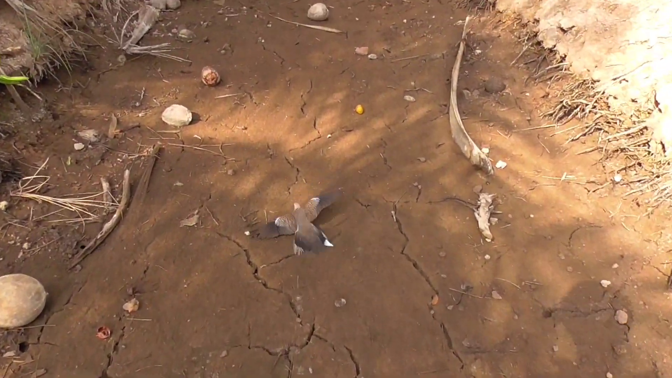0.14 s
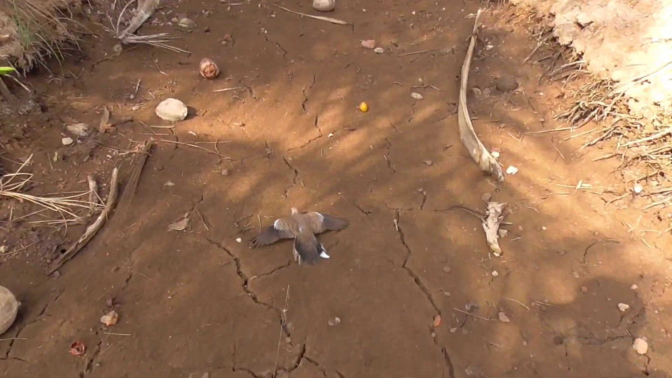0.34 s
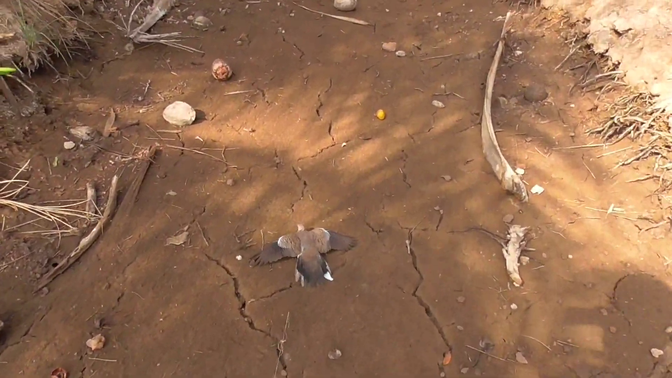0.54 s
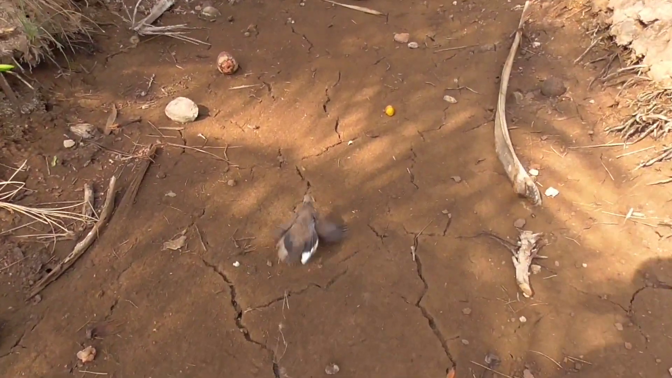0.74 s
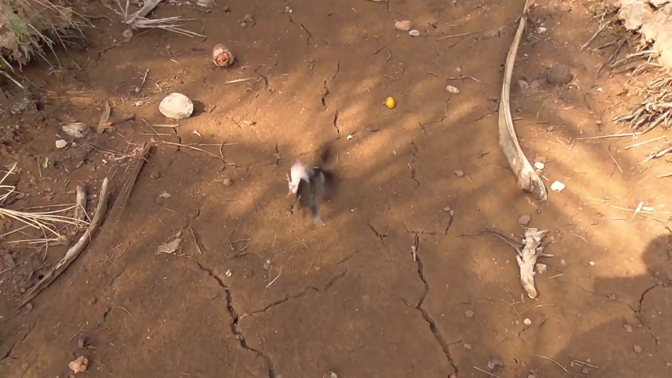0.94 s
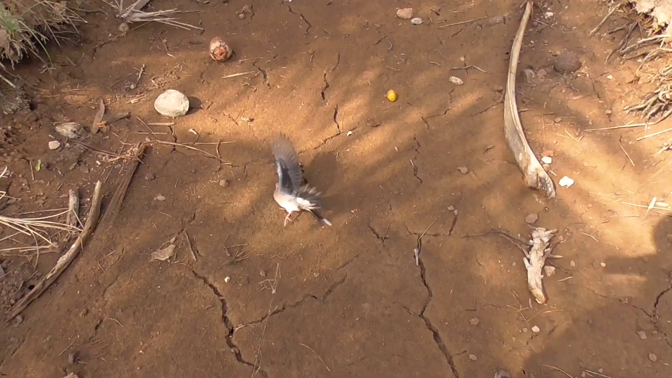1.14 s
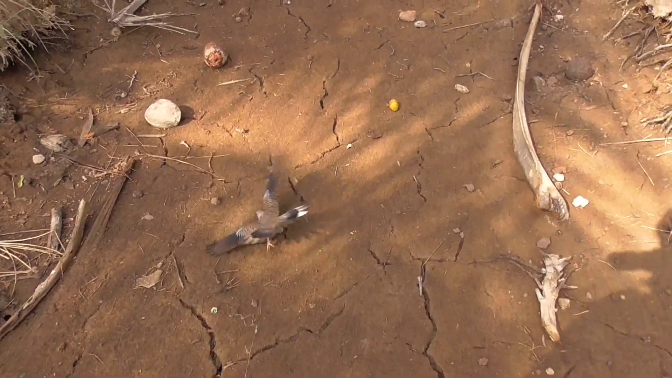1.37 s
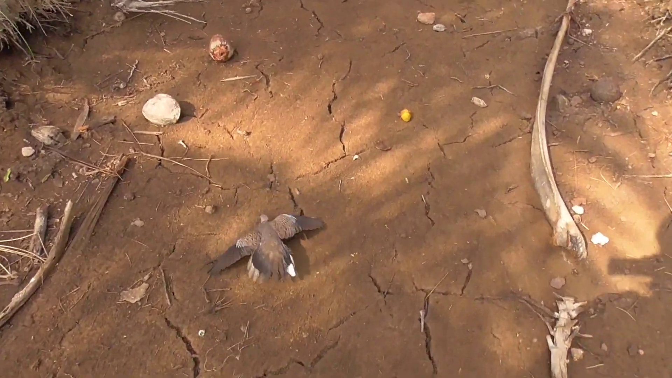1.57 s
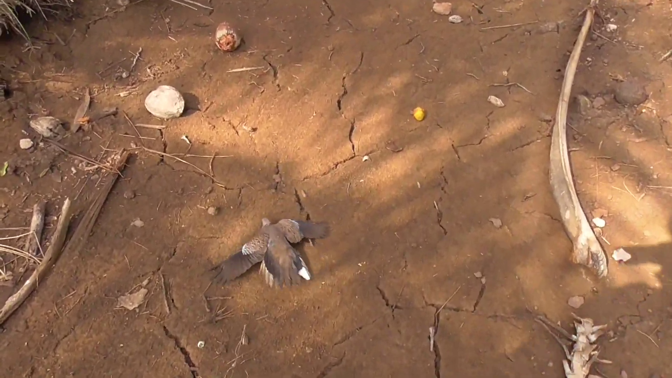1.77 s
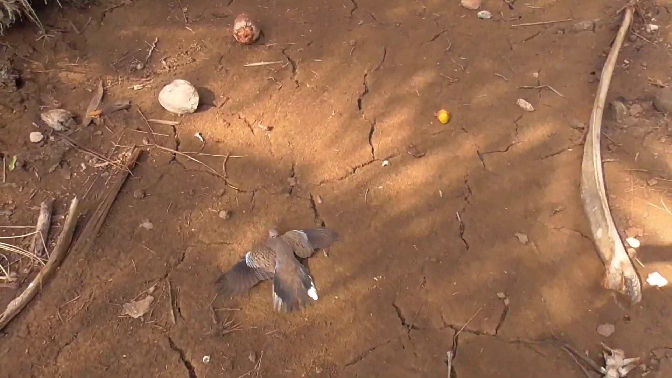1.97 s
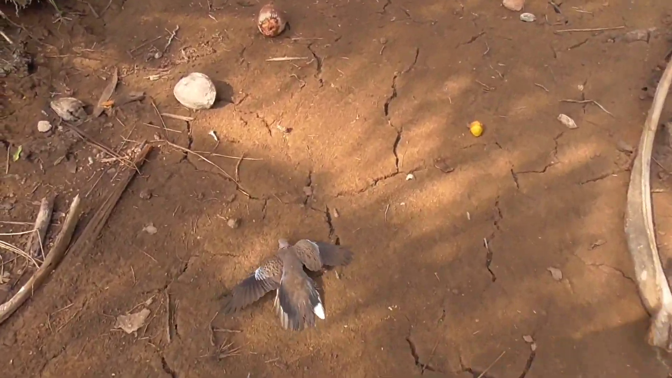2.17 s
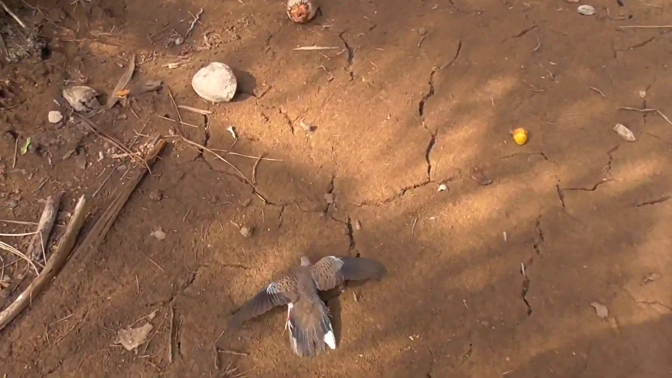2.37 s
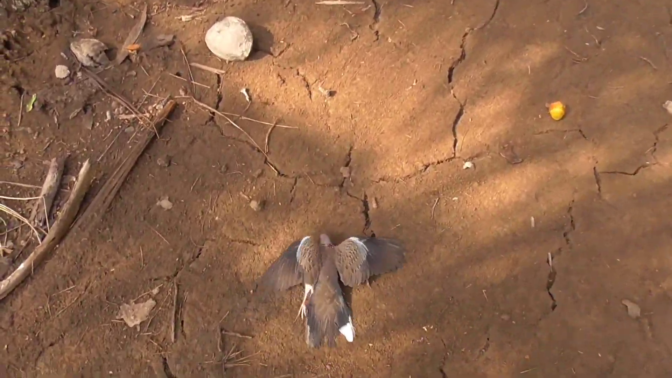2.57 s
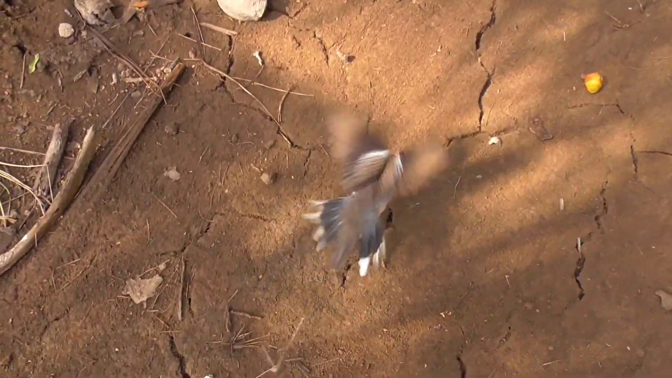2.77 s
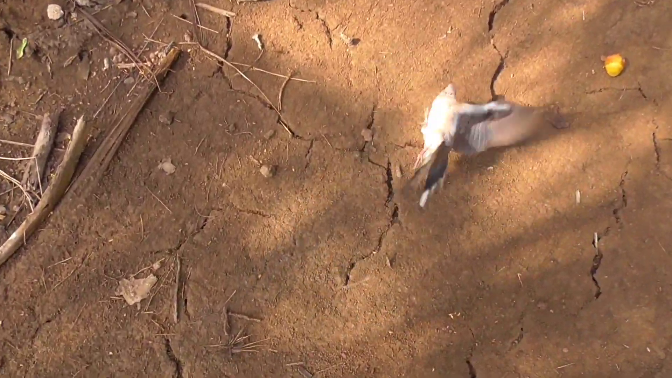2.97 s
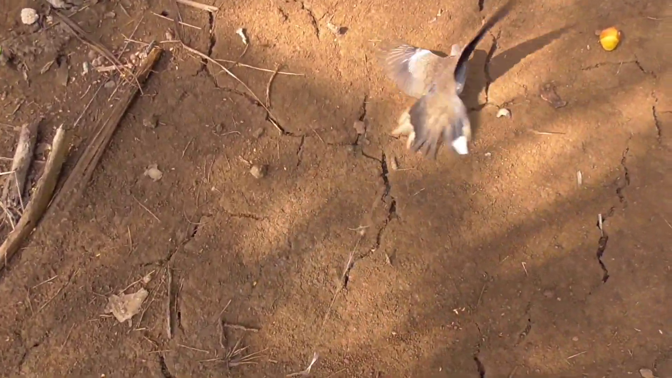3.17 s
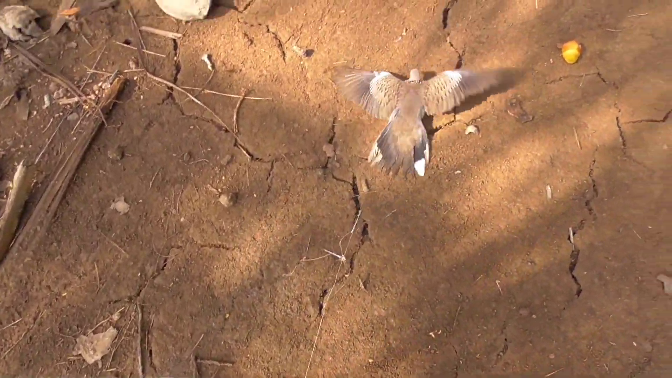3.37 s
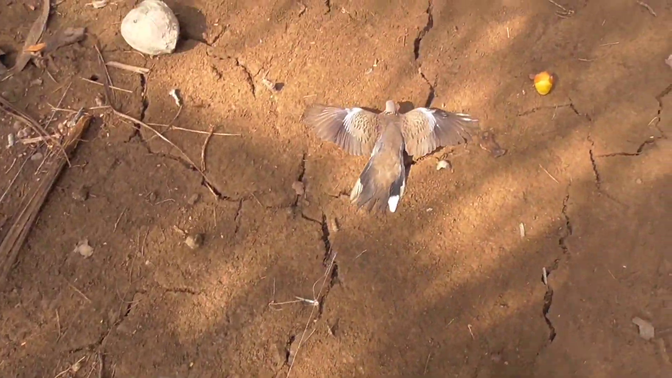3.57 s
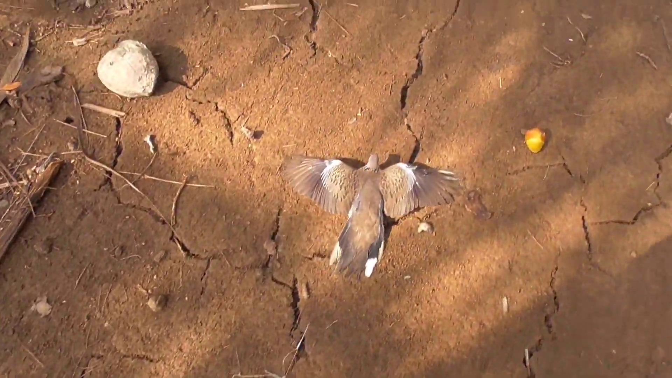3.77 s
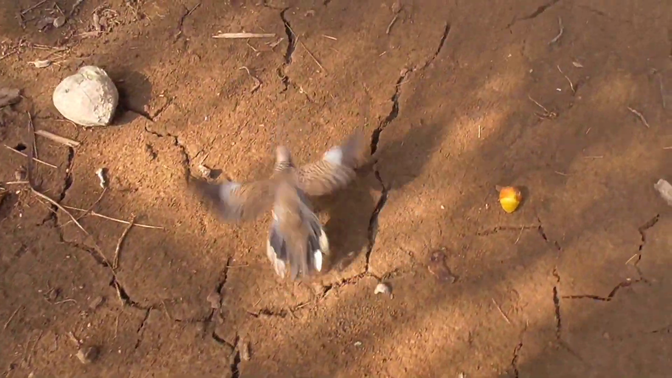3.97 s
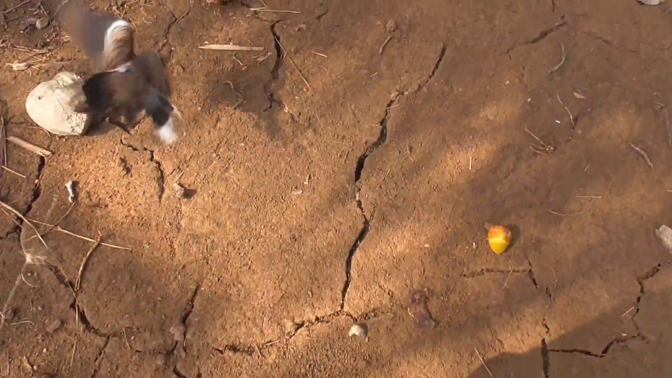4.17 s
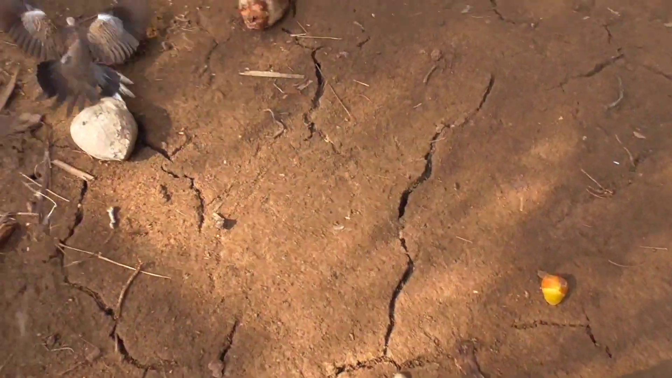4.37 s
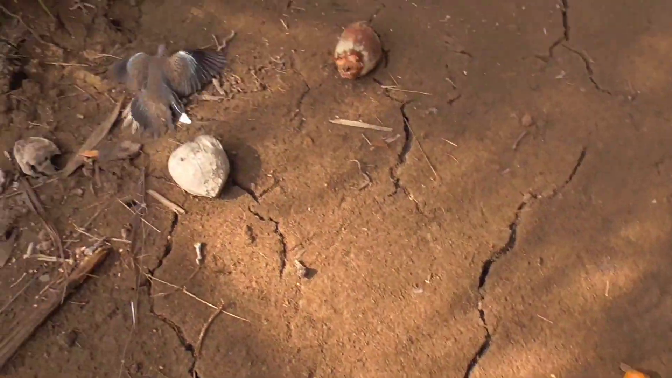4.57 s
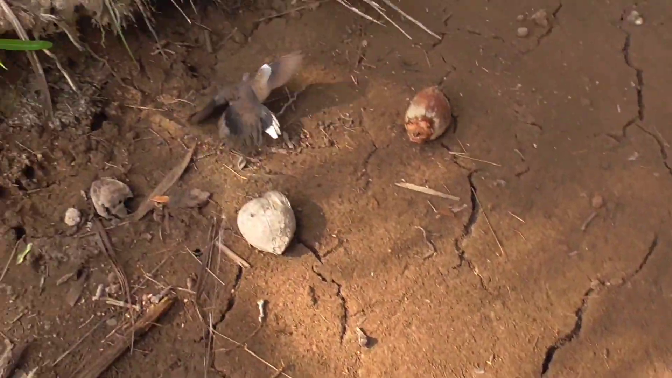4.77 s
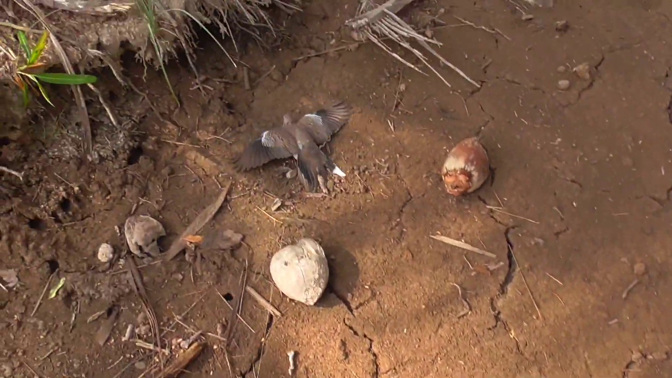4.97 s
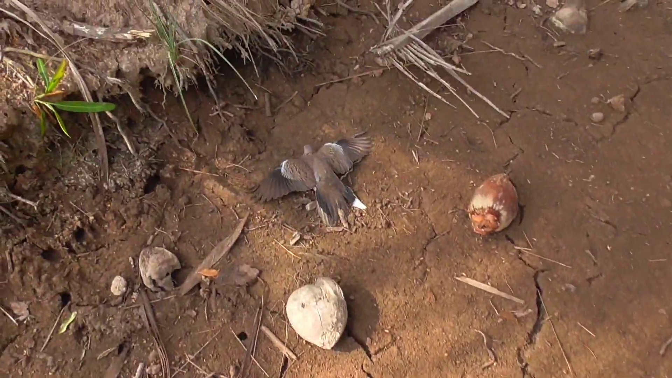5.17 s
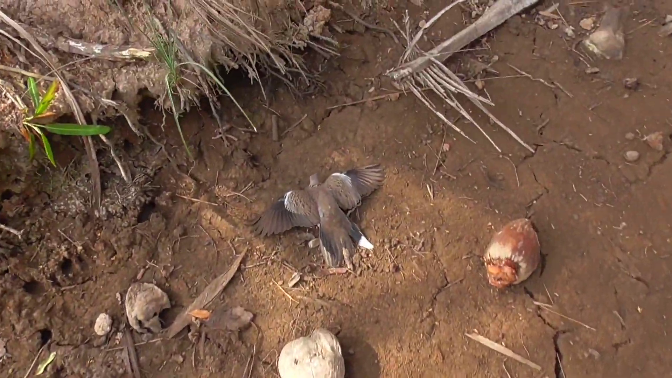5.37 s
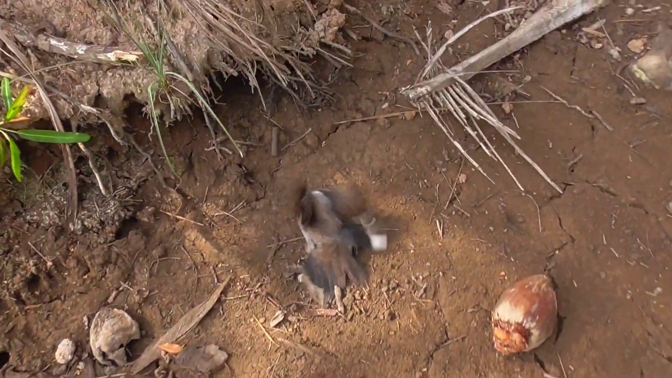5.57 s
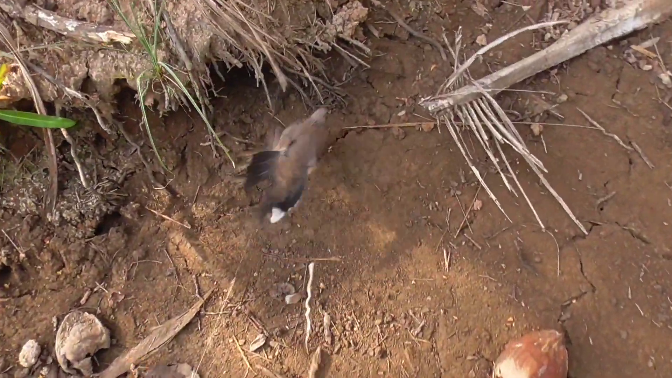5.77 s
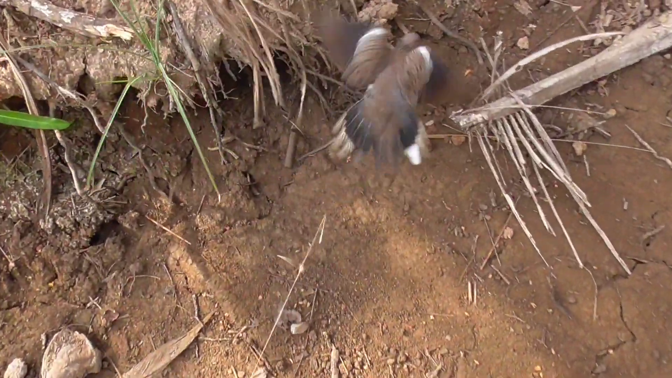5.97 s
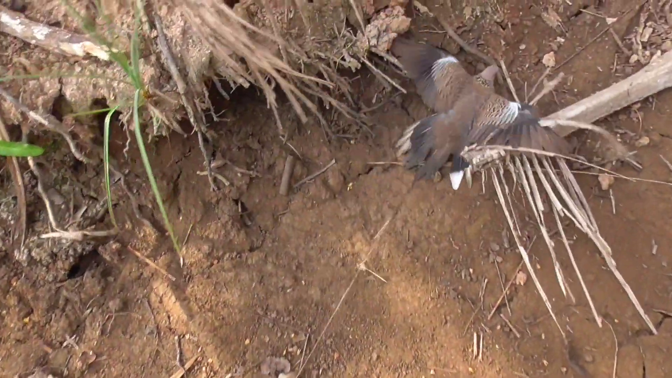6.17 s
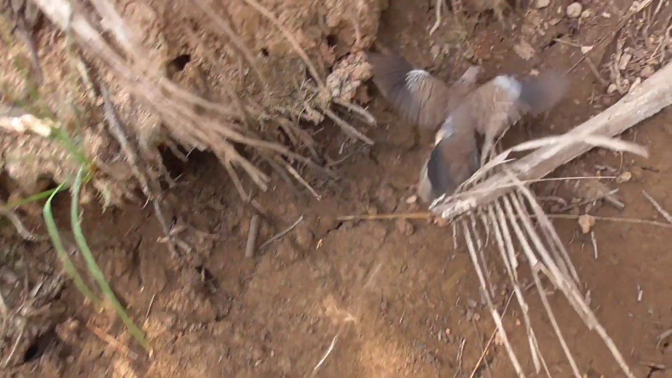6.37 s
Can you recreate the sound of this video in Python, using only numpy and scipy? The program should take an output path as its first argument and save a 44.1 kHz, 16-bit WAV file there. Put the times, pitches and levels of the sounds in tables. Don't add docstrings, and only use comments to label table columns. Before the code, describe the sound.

Open, dry outdoor ground, close stereo microphone. A quiet low rumble and thin leaf hiss run throughout. A tiny grain ping at 0.1 s starts a faint sandy trickle; around 0.5 s a soft low tail shiver. From 0.77 to 1.15 s comes the first flapping burst: low fluttering pulses, sharp quill cracks, dull knocks and bright feather scrapes on grit. A faint far motor hum swells near 1.6 s and fades by 2.5 s, with soft shuffles of air around it. A second, tight burst cracks at 2.8-3.1 s, its dust settling slowly. Near quiet follows, with small ticks. The third, hard burst at 4.0-4.3 s ends in a loud wing slap; a soft tap follows at 4.6 s. Soft shifts around 5.4-5.6 s lead to the last, longest burst, 5.7-6.2 s, dense with snaps and barb clicks, then a small scrape and flutter at 6.37 s as leaves rustle up.

```python
import sys
import numpy as np
from scipy import signal
from scipy.fft import rfft, irfft, next_fast_len
from scipy.io import wavfile
from scipy.ndimage import uniform_filter1d

SR = 44100
rng = np.random.default_rng(int(sys.argv[2]) if len(sys.argv) > 2 else 0)


def put_to_file(sound):
    columns = np.atleast_2d(sound).T
    safe = np.clip(columns, -1, 1)
    whole_steps = np.round(safe * 32767)
    wavfile.write(sys.argv[1], SR, whole_steps.astype(np.int16))


def voltage_ratio(decibels):
    exponent = np.asarray(decibels, float) / 20
    return 10 ** exponent


N = 283122
PADDED = next_fast_len(N)
BINS_HZ = np.maximum(np.fft.rfftfreq(PADDED, 1 / SR), 1)
TIME = np.arange(N) / SR
LEFT_RIGHT = np.array([[1], [-1]])
AIR_LEAN_DB, GROUND_LEAN_DB = -0.9, 0.4

# [f/Hz, level/dB]
SCRAPE_COLOUR = [(880, -35), (1500, -44), (1710, -13), (2440, -10), (3280, -3.5), (5490, -10.5),
                 (6400, -8.5), (7500, -1), (8160, 0), (9280, -0.5), (12700, -3.5), (14900, -10.5),
                 (16000, -20)]


def unit(x):
    return x / np.sqrt(np.mean(x ** 2))


def shape(table):
    hz, db = np.transpose(table)
    return voltage_ratio(np.interp(np.log(BINS_HZ), np.log(hz), db))


def colour(x, gain):
    return irfft(rfft(x, PADDED) * gain, PADDED)[..., :N]


def walk(rate):
    k = int(SR / rate)
    held = np.repeat(rng.standard_normal(N // k + 1), k)
    return 1.6 * uniform_filter1d(uniform_filter1d(held, k), k)[:N]


def stereo(mid, other, side_table):
    return mid + LEFT_RIGHT * colour(other, shape(side_table))


def lean(db, count):
    return db + 1.64 * rng.standard_normal(count)


def add(out, s, x, pan_db):
    i = int(s * SR)
    x = x[..., :N - i]
    out[:, i:i + x.shape[-1]] += x * voltage_ratio(LEFT_RIGHT * pan_db / 2)


def stir(build_s, settle_s):
    # [start t/s, length/s, effort 0-1, stretch of the settling]
    bursts = [
        (0.455, 0.033, 0.16, 1.01),
        (0.755, 0.21, 0.9, 0.97),
        (2.745, 0.23, 0.73, 1.63),
        (3.96, 0.28, 0.96, 0.74),
        (5.682, 0.25, 0.83, 1.01),
    ]
    efforts = []
    for s, length, effort, stretch in bursts:
        rise = np.clip((TIME - s) / min(build_s, length), 0, 1)
        fall = np.clip(1 - (TIME - s - length) / (settle_s * stretch), 0, 1)
        efforts.append(effort * rise * fall)
    return np.max(efforts, axis=0)


def bed():
    # [f/Hz, level/dB]
    calm_colour = [(22, -13), (50, -6.5), (85, -6.5), (185, 0), (300, -1.5), (480, -5), (800, -6.5),
                   (1350, -12.5), (1700, -21), (2600, -22), (3700, -20), (5700, -25), (8400, -19),
                   (14400, -27.5)]
    # [f/Hz, side minus mid/dB]
    width = [(60, -9), (110, -10), (200, -10), (380, -6.5), (700, -6.5), (1290, -5.5), (2380, -5),
             (4400, -2), (8120, -2.5), (15000, -0.5)]
    # [t/s, level over calm/dB]
    breeze = [(0, -1), (.35, -0.5), (.65, -2), (1.3, 0), (1.65, -1), (1.85, -1.5), (2.15, 2), (2.6, 1.5),
              (3.3, 0.5), (3.7, 3), (4.43, -1.5), (4.57, 7.5), (4.72, 0), (5.0, 6.5), (5.25, 0), (5.6, 3),
              (6.33, 12.5), (6.42, 5)]
    centres_hz = [70, 400, 3500, 9000]
    breeze_share = [0.22, 0.052, 0.69, 0.96]
    stir_db, build_s, settle_s = [17, 9.7, 10.5, 10.6], [.05, .17, .18, .19], [.2, .24, .27, .35]

    breeze_db = np.interp(TIME, *np.transpose(breeze))
    lifts = np.array([db * stir(build, settle) + share * breeze_db
                      for db, build, settle, share in zip(stir_db, build_s, settle_s, breeze_share)])
    noise = rfft(rng.standard_normal((2, PADDED))) * shape(calm_colour) * shape([(14900, 1), (15300, -45)])
    noise[1] *= shape([(25, -15)] + width)
    rustle = 0.72 * walk(26)
    out, total = 0, 0
    for hz in 25 * 2 ** np.arange(0, 9.6, .5):
        window = np.cos(np.pi * np.clip(np.log2(BINS_HZ / hz), -.5, .5)) ** 2
        mid, side = irfft(noise * window, PADDED)[:, :N]
        near = [np.interp(np.log(hz), np.log(centres_hz), row) for row in np.eye(len(lifts))]
        reach = min(hz / 70, 1)
        level_db = reach * (near @ lifts) + 0.84 * walk(14) + min(hz / 3300, 1) ** 2 * rustle
        out = out + voltage_ratio(level_db) * (mid + LEFT_RIGHT * side)
        total = total + mid
    return out / np.sqrt(np.mean(total ** 2)) * voltage_ratio(-44)


def drone():
    phase = 2 * np.pi * np.cumsum(55 * (1 + 0.022 * walk(2.97))) / SR
    nearest_s, swell_s, fades_s, fade_length_s = 1.6, 0.37, 2.4, .15
    swell_db = 4.5 * np.exp(-((TIME - nearest_s) / swell_s) ** 2)
    fade = 1 / (1 + np.exp((TIME - fades_s) / fade_length_s))
    return voltage_ratio(-56.5 + 1.5 * walk(3.8) + swell_db) * np.sin(phase) * fade


def trickle():
    centre_hz, width_hz, start_s, dies_s = 3730, 1900, .1, 0.48
    band = np.exp(-((BINS_HZ - centre_hz) / width_hz) ** 2)
    mid, side = unit(colour(rng.standard_normal((2, N)), band))
    late = TIME - start_s
    fade = (late > 0) * np.exp(-(late / dies_s) ** 2)
    return voltage_ratio(-53 + 3.0 * walk(27.8)) * (mid + LEFT_RIGHT * side) * fade


def pulses(rows):
    out = np.zeros((2, N))
    chance = rng.random((len(rows), 2))
    for row, (lag, waver), pan_db in zip(rows, chance, lean(AIR_LEAN_DB, len(rows))):
        s, db, hz, cycles, octave_db = row
        cycles = max(cycles, 1)
        u = np.arange(int(cycles / hz * SR)) * hz / SR / cycles
        phase = 2 * np.pi * cycles * u * (1.12 - 0.14 * u) - 3.0 - 1.12 * lag
        phase += .5 * np.sin(2 * np.pi * (1.53 * u + waver))
        overtone = voltage_ratio(octave_db - 2.5) * np.cos(2.17 * phase) * 1.78 * np.exp(-u / 0.66)
        swell = np.sin(np.pi * u ** 0.77) ** (0.9 + 0.069 * cycles)
        add(out, s, voltage_ratio(db) * swell * (np.cos(phase) + overtone), pan_db)
    return out


def grain():
    return pulses([(.0947, -31.5, 6210, 7.5, -29)])


def shuffles():
    # [t/s, level/dB, f/Hz]
    shifts = [(0.386, -47, 339), (1.439, -36, 256), (2.279, -44, 310), (2.41, -31.5, 273),
              (2.634, -35, 264), (4.831, -34, 258), (5.336, -30, 374), (5.385, -40, 307), (5.416, -30, 331),
              (5.577, -29, 297), (5.62, -37, 276)]
    return pulses([(s, db - 4.5, hz, 4, -9) for s, db, hz in shifts])


def shiver():
    # [t/s, level/dB, f/Hz, cycles]
    beats = [
        (0.473, -29, 135, 2.1),
        (.479, -33, 190, 1.6),
        (0.514, -31, 125, 1.9),
        (.524, -36, 120, 1.8),
    ]
    return pulses([tuple(row) + (-11,) for row in beats])


def puffs():
    # [t/s, level/dB, f/Hz]
    sheds = [(0.867, -30, 243), (0.983, -24, 265), (0.998, -22, 286), (2.878, -19, 254), (2.9284, -20, 232),
             (2.964, -22, 207), (2.98, -19, 289), (4.0185, -21.5, 224), (4.0311, -17, 208),
             (4.048, -19, 237), (4.1026, -21, 242), (4.128, -21, 219), (4.209, -21, 235), (4.253, -26, 223),
             (5.873, -17, 200), (5.883, -28, 245), (5.917, -27, 182), (5.9293, -33, 237),
             (5.997, -17.5, 203), (6.015, -22, 236), (6.0322, -21, 183), (6.043, -28, 242)]
    return pulses([(s, db, hz, 1.56, -18) for s, db, hz in sheds])


def eddies():
    # [t/s, level/dB, f/Hz, cycles]
    rolls = [(.492, -33, 280, 4.8), (.846, -30, 220, 1.6), (.868, -25, 300, 2), (.951, -23, 292, 3),
             (1.112, -30, 292, 3.3), (1.136, -28, 910, 3.7), (2.885, -20, 308, 2.2), (2.921, -23, 200, 1.5),
             (4.044, -16, 850, 2.2), (4.054, -24, 600, 2.2), (4.095, -23, 200, 2), (4.18, -24, 210, 1.3),
             (5.735, -24, 704, 3.6), (5.808, -23, 300, 2.2), (5.829, -18, 450, 2.2),
             (5.835, -14.5, 1020, 2.8), (5.842, -19, 800, 2.6), (5.866, -20, 800, 2.8),
             (5.884, -24, 280, 2), (6.373, -29.5, 796, 2.8)]
    return pulses([tuple(row) + (-13,) for row in rolls])


def ticks():
    # [t/s, level/dB, f/Hz]
    flicks = [(0.4014, -39, 8660), (1.6316, -27, 9120), (3.5254, -35, 9030), (4.198, -16, 9770),
              (4.2687, -28, 8940), (4.3415, -30, 4200), (4.3784, -40, 8840), (4.42, -27, 8300),
              (5.9334, -23, 10500), (5.9663, -21, 8740), (5.9877, -18, 7850), (6.0074, -13, 10700),
              (6.0364, -23, 8360), (6.0884, -14, 7720), (6.112, -18, 9150), (6.1354, -20, 8070)]
    return pulses([(s, db - 5.5, hz, 7.3, -40) for s, db, hz in flicks])


def barbs():
    # [t/s, level/dB, f/Hz]
    clicks = [(0.0961, -33, 5800), (0.3984, -34, 9300), (0.7717, -30, 9100), (0.8046, -29, 8600),
              (0.8158, -20, 4000), (0.8304, -8, 5200), (0.8316, -17, 8100), (0.8341, -15, 9600),
              (0.9457, -23, 7800), (0.9752, -13, 4200), (1.0646, -26, 9700), (1.0748, -33, 8200),
              (1.1272, -28, 7700), (1.1482, -27, 7300), (1.6486, -34, 9800), (1.8872, -34, 9500),
              (2.1291, -34, 7800), (2.7955, -13, 9500), (2.8806, -10, 9300), (2.9271, -22, 7300),
              (2.941, -30, 8100), (2.9517, -22, 6200), (3.0172, -30, 9300), (3.0215, -28, 8200),
              (3.0354, -23, 8500), (3.0667, -29, 9600), (3.0711, -28, 6100), (3.0766, -28, 7100),
              (3.1092, -25, 7900), (3.1836, -28, 5300), (3.3725, -34, 9600), (3.3739, -36, 7200),
              (3.6996, -35, 9400), (4.0463, -9, 8400), (4.0519, -7, 7900), (4.0664, -20, 8000),
              (4.122, -14, 5100), (4.1989, -18, 9000), (4.2698, -24, 6500), (5.033, -35, 8300),
              (5.6779, -25, 8600), (5.7548, -12, 6900), (5.7858, -25, 7800), (5.8301, -12, 7800),
              (5.8325, -6, 8400), (5.9068, -6, 7500), (5.9502, -25, 5500), (5.9675, -20, 8900),
              (5.9833, -23, 7600), (5.996, -9, 7300), (6.017, -9, 9900), (6.0633, -26, 8000),
              (6.0922, -17, 7300), (6.1366, -21, 10700), (6.178, -29, 7900), (6.1858, 0, 5300),
              (6.2831, -30, 6700), (6.3856, -22, 9100)]
    click_ms, fizz_ms, fizz_db = 0.14, 1.1, -14
    out = np.zeros((2, N))
    ms = np.arange(-32, 224) / SR * 1000
    chance = rng.standard_normal((len(clicks), 2, len(ms) + 2))
    for (s, db, hz), c in zip(clicks, chance):
        ears = c[0] + .3 * LEFT_RIGHT * c[1]
        click = np.exp(-(ms / click_ms) ** 2) * np.cos(2 * np.pi * hz * ms / 1000 + 2 * ears[:, :1])
        fizz = np.diff(ears[:, 1:]) * (ms > 0) * np.exp(-abs(ms) / fizz_ms)
        add(out, s - 32 / SR, voltage_ratio(db - 3.5) * (click + voltage_ratio(fizz_db) * fizz), GROUND_LEAN_DB + c[1, 1])
    return out


def taps():
    # [t/s, level/dB, f/Hz, rise/ms, fall/ms]
    contacts = [(.5022, -23, 136, 15, 10), (4.3467, -18, 290, 2.2, 2.6), (4.5904, -29, 900, .6, .9),
                (4.5951, -11.5, 850, .9, 1.1), (4.6022, -23, 950, .6, .9), (4.379, -31, 1100, .5, .8),
                (4.3435, -26, 600, .7, .7), (6.1868, -17, 1450, .45, 1.6), (3.0595, -30, 1500, .45, .8),
                (3.1225, -27, 1900, .4, .7), (6.043, -25, 1800, .4, .8)]
    out = np.zeros((2, N))
    ms = np.arange(-SR // 25, SR // 25) / SR * 1000
    for s, db, hz, rise, fall in contacts:
        phase = 2 * np.pi * hz * ms / 1000
        octave = (hz < 200) * voltage_ratio(-4) * np.cos(2 * phase - .4)
        swell = np.exp(-(ms / np.where(ms < 0, rise, fall)) ** 2)
        add(out, s + ms[0] / 1000, voltage_ratio(db) * swell * (np.cos(phase) + octave), 0.2)
    return out


def knocks():
    # [t/s, level/dB, f/Hz]
    hits = [(0.517, -36, 864), (.525, -36, 886), (.553, -34, 855), (.566, -36, 490), (.799, -24, 536),
            (.823, -15, 960), (.877, -31, 759), (0.909, -18, 900), (.934, -22, 900), (.947, -19, 716),
            (.988, -22, 650), (1.042, -26, 676), (2.911, -16.5, 550), (2.924, -23, 958), (2.9507, -19, 680),
            (2.956, -12.5, 1140), (2.964, -16, 659), (2.987, -20, 800), (3.04, -22, 1170),
            (4.166, -19, 453), (4.179, -23, 875), (4.232, -19, 530), (4.309, -29, 678), (5.792, -16.5, 517),
            (5.989, -19, 1020), (6.041, -19, 649), (4.5743, -31, 1200)]
    return pulses([(s, db - 2, hz, 2.3, -9) for s, db, hz in hits])


def snaps():
    # [t/s, crack level/dB, ring level/dB, ring f/Hz, ring t60/s]
    strikes = [(0.8293, -4.5, -18, 1100, 0.013), (.9062, -10, -11.5, 810, 0.0065),
               (0.976, -8, -13, 1050, 0.0087), (1.11, -5, -10.5, 850, 0.0064),
               (2.7861, -2.5, -6.5, 850, 0.0056), (2.8756, -7.5, -10.5, 1330, 0.0056),
               (2.8826, -4, -25, 960, 0.0037), (2.9514, -34, -24, 820, .037), (2.9592, -5, -22, 890, 0.028),
               (3.2019, -24, -35, 1000, 0.059), (4.0498, -1, -15.5, 1270, 0.015),
               (4.1218, -15, -10.5, 990, 0.0058), (4.1327, -9, -27, 930, 0.017),
               (4.4186, -29, -41, 860, .045), (3.1015, -24, -29, 900, 0.01),
               (5.753, -0.5, -16, 1100, 0.017), (5.8305, -25, -23, 1020, 0.026),
               (5.9063, -5.5, -16.5, 1340, 0.016), (5.9676, -23, -29, 635, 0.057),
               (5.9965, -6, -12, 1030, 0.008), (6.0205, -8, -23, 740, 0.039), (6.0717, -12, -8, 810, 0.017),
               (6.1857, -1.5, -5, 837, 0.017), (6.291, -24, -25.5, 730, 0.034)]
    crack, ring = np.zeros((2, 2, N))
    t = np.arange(SR // 16) / SR
    chance = rng.standard_normal((len(strikes), 2, 256)) * np.exp(-t[:256] / 0.00066)
    for row, (a, b), pan_db in zip(strikes, chance, lean(GROUND_LEAN_DB, len(strikes))):
        s, db, ring_db, hz, t60 = row
        ears = np.array([a + 0.1 * b, a - 0.42 * b])
        add(crack, s, voltage_ratio(db + 6.5) / abs(a).max() * ears, pan_db)
        decay = np.exp(-np.log(1000) * t / t60) * (1 - np.exp(-t / 0.00035)) ** 2
        phase = 2 * np.pi * hz * (0.817 * t + 0.0005 * (1 - np.exp(-t / 0.0025)))
        upper = voltage_ratio(-10) * np.exp(-3.5 * t / t60) * np.sin(1.31 * phase)
        add(ring, s - .0008, -voltage_ratio(ring_db) * decay / decay.max() * (np.sin(phase) + upper), pan_db)
    return colour(crack, shape(SCRAPE_COLOUR) * shape([(9000, 1.0), (14000, -5.5)])) + ring


def grit(spread_db, share):
    big = (rng.random(N) < share) * voltage_ratio(spread_db * np.minimum(rng.exponential(size=N), 3))
    return rng.standard_normal(N) * (1 + big)


def even(x):
    power = uniform_filter1d(x ** 2, int(7.8 * SR / 1000)) + .02
    return unit(x / np.sqrt(power))


def scrapes():
    # [t/s, level/dB, rise/ms, fall/ms, body below 2 kHz/dB]
    strokes = [(.8145, -23.5, 5, 15, -4.5), (.899, -22, 3.5, 10.5, 2), (1.6081, -44, 15, 22, -3),
               (2.28, -61, 9.5, 33, 20), (2.7847, -12.5, 1.7, 2.1, -4.5), (2.798, -24.5, 12.3, 4.9, -4.5),
               (2.864, -16.5, 20.3, 5.1, -2.5), (3.264, -42.5, 16, 34, -20), (4.041, -14.5, 8.4, 3.5, -0.5),
               (4.0969, -35, 27, 22, -1), (4.117, -19, 17, 4.8, 1), (4.2084, -24, 5.4, 2.3, -5),
               (5.6779, -41, 48, 180, 0.5), (5.748, -17, 6, 9, -8), (5.816, -20.5, 19, 7.7, -2),
               (6.066, -13.5, 7, 4.5, -5), (6.364, -30, 12.4, 7.2, -9.5), (.471, -61, 21, 30, 20.5)]
    # [t/s, level/dB, body below 2 kHz/dB]
    drags = [(.381, -47, -22), (0.938, -33, -10), (0.972, -31.5, 2.5), (1.046, -37, -1), (1.128, -41.5, -2),
             (1.203, -44, -10), (2.767, -38.5, 8), (2.842, -35.5, 8), (2.918, -40, 4), (2.947, -27, 5),
             (3.029, -34.5, 5), (3.0978, -38, 7), (3.118, -35, 1), (3.175, -36, 2.5), (3.351, -47, -22),
             (3.377, -49, 6), (3.521, -43, -9), (4.021, -33.5, 2.5), (4.195, -35.5, 7.5), (4.258, -43, 8.5),
             (4.28, -44, -5), (.508, -57, 13.5), (.548, -65, 11), (4.337, -44.5, 8), (5.7654, -38, -7),
             (5.889, -27.5, 3), (5.915, -44, -2), (5.984, -29, 3), (6.0344, -45, 10), (3.06, -40, -9),
             (6.097, -36, -15), (6.227, -30, -2)]
    # [t/s, level/dB, body below 2 kHz/dB]
    catches = [(.769, -39, -20), (.796, -34, 6.5), (0.816, -29, 4), (1.087, -49, 8), (1.1087, -28, 2),
               (1.206, -49, 15.5), (2.7923, -19.5, -6), (3.384, -50, 13), (4.059, -24, -15),
               (4.3092, -53, 19.5), (4.378, -54, 15), (4.418, -38.5, -20), (4.589, -47, 15), (4.6, -52, 12),
               (6.0168, -16.5, -12), (6.159, -27, -19), (6.185, -23, 5), (6.197, -27, -7), (6.229, -40, -1),
               (6.386, -30.5, -12), (6.089, -30, -18), (6.11, -33, -6), (5.917, -28, -8), (2.955, -24, -6),
               (4.197, -34, -10), (5.9325, -41, -7), (6.006, -29, -13), (6.036, -37, -5), (.398, -46, -20),
               (3.524, -51, -8)]
    # [f/Hz, level/dB]
    body_colour = [(80, -49), (200, -7), (500, 0.5), (900, 2), (1400, -3), (2200, -11.5), (3500, -30.5)]
    # [f/Hz, side minus mid/dB]
    width = [(60, -10), (110, -10), (200, -17), (380, -11), (700, -17), (1290, -15), (2380, -14.5),
             (4400, -9), (8120, -8), (15000, -4.5)]

    rows = (list(strokes)
            + [(s, db, 5.1, 17.4, body_db) for s, db, body_db in drags]
            + [(s, db, 1.1, 4.8, body_db) for s, db, body_db in catches])
    bright, coarse, body = np.zeros((3, 2, N))
    ms = np.arange(SR // 6) / SR * 1000
    for (s, db, rise, fall, body_db), pan_db in zip(rows, lean(GROUND_LEAN_DB, len(rows))):
        late = np.maximum(ms - rise, 0)
        onset = np.minimum(ms / rise, 1)
        swell = onset ** 1.1 * (np.exp(-late / fall) + 0.091 * np.exp(-late / 40))
        coarse_swell = onset * (np.exp(-late / fall / .85) + .075 * np.exp(-late / 35))
        add(bright, s, swell * voltage_ratio(db - 1.08), pan_db)
        add(coarse, s, coarse_swell * voltage_ratio(db - 0.7), pan_db)
        add(body, s, swell * voltage_ratio(db + body_db - 3.0), pan_db)

    rough = voltage_ratio(2.03 * walk(400))
    hiss = [unit(colour(grit(0.88, 0.011), shape(SCRAPE_COLOUR))) for _ in range(2)]
    thud = [even(unit(colour(grit(3.2, 0.01), shape(body_colour)))) for _ in range(2)]
    hiss = stereo(*hiss, width)
    low = colour(hiss, 1 / (1 + (BINS_HZ / 6600) ** 8))
    rubbing = rough * (bright * (hiss - low) + coarse * rough ** .6 * low)
    return rubbing + body * voltage_ratio(2.8 * walk(150)) * stereo(*thud, width)


def claps():
    # [t/s, level/dB, f/Hz, cycles]
    slaps = [
        (1.013, -11.5, 281, 2.8),
        (2.7983, -27, 286, 5),
        (2.842, -18.5, 216, 2.7),
        (2.9931, -9, 273, 3),
        (4.1632, -21, 286, 0.97),
        (4.2381, -7.5, 279, 3),
        (5.7514, -12.5, 235, 1.7),
        (5.838, -17.5, 250, 1.67),
        (5.8601, -14.5, 348, 3.9),
        (6.069, -14.5, 251, 2.2),
    ]
    return pulses([tuple(row) + (-2,) for row in slaps])


def flutters():
    # [t/s, level/dB, f/Hz, cycles]
    beats = [(0.7839, -17, 276, 3.8), (0.8141, -14, 270, 1.56), (0.855, -25, 327, 4),
             (0.9006, -18.5, 173, 2.3), (0.9247, -12.5, 347, 5.9), (2.7842, -10, 270, 3.1),
             (2.854, -23, 216, 4.2), (2.9031, -16.5, 258, 1.74), (3.382, -31, 318, 2.6),
             (3.521, -30.5, 267, 3), (4.15, -20.5, 312, 6.2), (4.3385, -26, 342, 2),
             (5.7175, -21, 228, 5.1), (5.795, -12, 223, 3.2), (5.807, -26, 254, 1.9),
             (5.9446, -8, 280, 2.95), (6.371, -29.5, 311, 3.1), (0.546, -38, 291, 8.6), (0.52, -38, 101, 2),
             (.938, -21, 320, 6), (4.168, -22.5, 230, 2.3), (4.288, -31, 201, 2.8),
             (6.078, -24.5, 252, 3.6)]
    return pulses([tuple(row) + (-9,) for row in beats])


def scene():
    air = flutters() + claps() + puffs() + eddies() + shiver() + shuffles()
    ground = scrapes() + snaps() + knocks() + ticks() + grain()
    bird = colour(air + ground, shape([(30, -24), (90, -0.5)]))
    t = np.arange(SR // 8) / SR
    scatter = rng.standard_normal((2, len(t))) * np.exp(-t / 0.015) * (t > .003)
    echo = voltage_ratio(-44.0) * signal.fftconvolve(bird, scatter, axes=1)[:, :N]
    return bird + echo + bed() + drone() + trickle() + barbs() + taps()


def low_pass(x):
    return signal.sosfilt(signal.butter(12, 16610, fs=SR, output="sos"), x)


def record(dry):
    rounded = np.tanh(1.1 * dry) / 1.1
    finished = colour(rounded, shape([(15000, 0), (15700, -14), (16600, -45)]))
    return low_pass(finished)


dry = scene()
out = record(dry)
put_to_file(out)
```